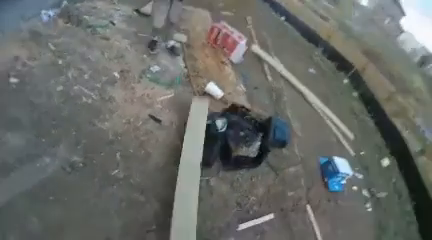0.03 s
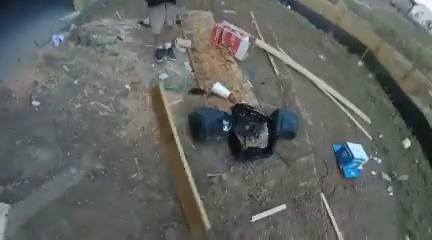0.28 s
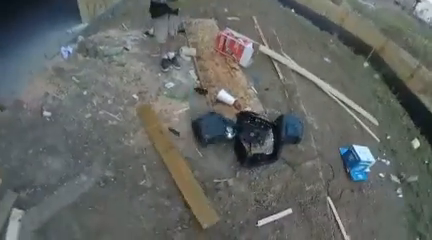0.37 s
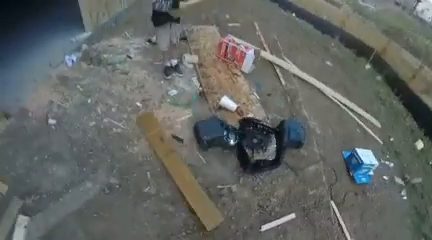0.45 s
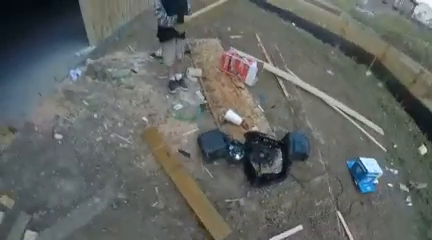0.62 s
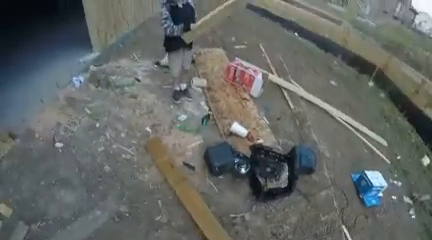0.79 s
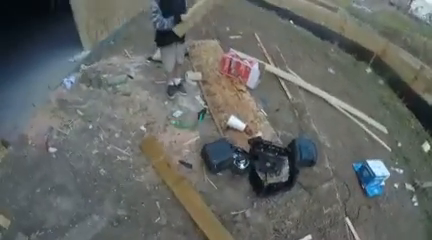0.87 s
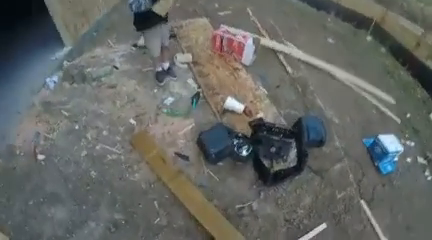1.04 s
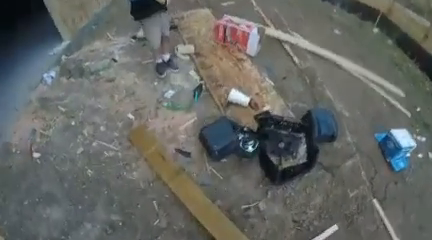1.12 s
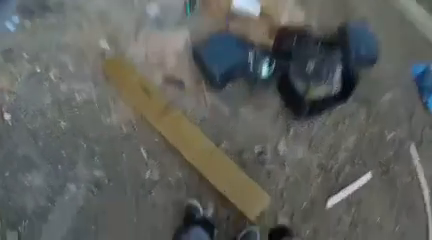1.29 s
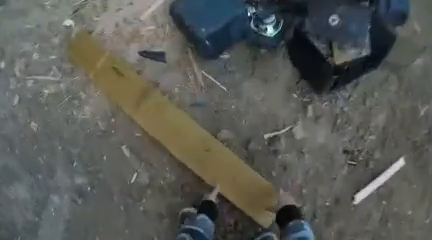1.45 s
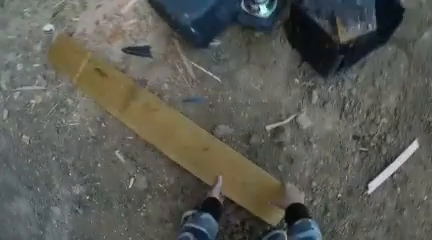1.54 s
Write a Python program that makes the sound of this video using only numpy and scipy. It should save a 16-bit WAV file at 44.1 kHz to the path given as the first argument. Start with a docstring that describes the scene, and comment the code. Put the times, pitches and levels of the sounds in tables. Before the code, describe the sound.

A wooden board smashes a plastic stereo with a sharp crack, and broken pieces clatter down.

```python
"""A building site: a wooden board smashes a plastic stereo, heard from where it is swung.
The case gives way in a burst of cracks, its panels ring and broken pieces clatter down;
the walls around throw the crash back. Then a step forward on gritty ground,
with air buffeting the microphone over distant site noise."""
import sys
import numpy as np
from scipy import signal
from scipy.fft import rfft, irfft
from scipy.io import wavfile

SR = 44100
rng = np.random.default_rng(int(sys.argv[2]) if len(sys.argv) > 2 else 0)


def dump_mix(stems):
    """Bounce the given channels to the path in sys.argv[1] as a 16-bit WAV at rate SR."""
    frames = np.atleast_2d(stems).T  # one column per channel
    limited = np.clip(frames, -1, 1)  # hard clip at full scale
    pcm = np.round(limited * 32767).astype(np.int16)
    wavfile.write(sys.argv[1], SR, pcm)


N = 70560
T = np.arange(N) / SR

# case cracks: start_s, level_db (re CRASH_DB), tilt_db_per_octave
CRACKS = [(0.2187, -11, -10.5), (0.22, -23, -8), (0.223, -5, -2.5), (0.2247, -4.5, 2), (0.2261, 0.5, 2),
          (.228, 3, -0.5), (0.2296, -0.5, -2), (.2312, -4, -8), (.235, -5, 4), (0.2395, -6, -3),
          (0.2486, -4, 3), (.2522, -8.5, -11), (0.2579, -10.5, 1), (0.2626, -11, -4.5)]
# case spectrum: freq_hz, level_db
CASE_SPECTRUM = [(60, -38), (160, -30), (280, -21), (430, -21.5), (580, -35), (780, -27), (920, -13.5),
                 (1080, -16.5), (1190, -22), (1360, -5), (1520, -14.5), (1700, -3.5), (2050, -2.5),
                 (2350, -5), (2600, 3), (2900, 3.5), (3150, -14), (3450, -7), (3700, -17), (4050, -4),
                 (5200, -5.5), (7200, -19), (9500, -13.5), (10800, -23.5), (13000, -27), (15500, -40.5)]
# case decay: freq_hz, t60_s
CASE_DECAY = [(200, .08), (1000, .06), (2700, 0.071), (5000, .075), (10000, .06), (15000, .06)]
# panel modes: pitch_hz, relative_db, t60_s
PANEL_MODES = [(324, -34.5, .35), (903, -21, 0.44), (972, -11, 0.12), (1370.4, -7.5, 0.13),
               (1685.5, -3, .23), (1772, -4, .18), (2170, -5.5, 0.21), (2561, -2.5, .17), (2759, -0.5, .18),
               (2826, -2.5, .17), (2896, 3, .19), (2980, -1.5, .19), (4310, -6, .17), (5440, -8.5, .17)]
# low board modes: pitch_hz, level_db, t60_s
BOARD_MODES = [(125, -44, .07), (234, -36.5, 0.11), (415, -35, .06), (490, -37, .05)]
CRASH_DB, BLOW_S = 18.5, .226

def crash(snap_db=-6.5, splinter_db=-3.5, panel_db=-7):
    """Each crack rings another part of the case; splinters spray, panels ring on, the board thuds."""
    case, out = np.zeros(N), np.zeros(N)
    for start_s, level_db, tilt_db in CRACKS:
        ring = dense_ring(CASE_DECAY)
        ring[0] += amp(snap_db) * rng.choice([-1, 1])
        crack = signal.fftconvolve(ring, colour(CASE_SPECTRUM, tilt_db))
        add(case, start_s, amp(level_db) * unit(crack))
    spray = impulses(per_s=5000) * fade(t60_s=.23)
    splinters = through(spray, colour(CASE_SPECTRUM, tilt_db=2.5))
    add(case, BLOW_S, amp(splinter_db) * unit(splinters))
    panels = ring_out(PANEL_MODES, rise_s=.015)
    add(out, BLOW_S, amp(CRASH_DB + panel_db) * unit(panels))
    add(out, CRACKS[0][0], ring_out(BOARD_MODES, rise_s=.012))
    return out + amp(CRASH_DB) * unit(case)


def dense_ring(decay, size=8192):
    """Countless close modes of even strength, each band dying at its own speed."""
    hz = np.fft.rfftfreq(size, 1 / SR)
    spectrum = rfft(rng.standard_normal(size))
    centres_hz, t60_s = np.transpose(decay)
    ring = np.zeros(size)
    for band_t60_s, selector in zip(t60_s, np.eye(len(t60_s))):
        band = irfft(spectrum * interp_log_hz(np.c_[centres_hz, selector], hz))
        ring += band * fade(band_t60_s)[:size] / np.sqrt(band_t60_s)
    return unit(ring)


def ring_out(modes, rise_s):
    """Struck modes swell, then decay freely."""
    ring = sum(amp(db) * sine(hz, rng.random()) * fade(t60_s) for hz, db, t60_s in modes)
    return ring * (1 - fade(rise_s))


# shard landings: start_s, level_db (re shard_db), tilt_db_per_octave, t60_s
SHARD_LANDINGS = [(0.347, -11.5, 10.5, .05), (.368, -5.5, -2, 0.026), (.462, -9, 2.5, 0.051),
                  (0.5144, -10.5, -0.5, 0.054), (.5423, -13.5, 5, .04), (0.5639, -8.5, 2, 0.058),
                  (.604, -9, 0.5, 0.077), (.631, -13, 1.5, 0.069), (0.648, -15, -2.5, 0.053),
                  (0.7163, -12, 3.5, 0.055), (.738, -14.5, -4, 0.1), (0.765, -15.5, 1, .05),
                  (.7807, -11.5, 2.5, 0.071), (.802, -20.5, -3, 0.071), (0.8422, -26.5, 4, .05),
                  (.857, -17.5, 2.5, 0.13), (0.9321, -14, 3.5, .04), (.966, -12.5, -9, 0.041),
                  (.98, -15, -0.5, 0.08), (1.0065, -12.5, -2, .08), (1.019, -16, -2, 0.11),
                  (1.055, -25.5, 1.5, .09), (1.2046, -29, -1, .02)]
# shard spectrum: freq_hz, level_db
SHARD_SPECTRUM = [(400, -35), (900, -18), (1300, -12.5), (1800, -2), (2300, -5), (2850, 4), (3200, -8),
                  (3750, -14), (4200, -7), (5200, -6), (7300, -20), (9700, -17.5), (11000, -28),
                  (15000, -33.5)]
# larger pieces ringing: start_s, pitch_hz, level_db, t60_s
PIECE_RINGS = [(.509, 7194, -46.5, 0.038), (0.5641, 2616, -33.5, 0.065), (.5642, 2939, -43.5, 0.26),
               (0.5886, 1732, -30, .075), (0.5885, 1287, -42, .15), (.5887, 889, -54, .6),
               (.5887, 2792, -45, .35), (.738, 1294, -51.5, 0.12), (0.9309, 4186, -33.5, .022),
               (.934, 2939, -40.5, 0.14), (.9314, 3440, -46, .06), (1.003, 1760, -45.5, .07),
               (1.014, 2822, -46.5, 0.051), (1.013, 4200, -53, .1)]

def clatter(shard_db=-7.5, tick_db=-3, bounce_db=-5, mean_bounce_s=.0036):
    """Each piece ticks and clinks on one edge, then on another; the larger ones ring."""
    out = np.zeros(N)
    for start_s, level_db, tilt_db, t60_s in SHARD_LANDINGS:
        contact = amp(tick_db) * unit(rng.standard_normal(N) * fade(t60_s=.022))
        add(contact, 0, shard_ring(t60_s))
        add(contact, mean_bounce_s * (.5 + rng.random()), amp(bounce_db) * shard_ring(t60_s))
        clink = through(contact, colour(SHARD_SPECTRUM, tilt_db))
        add(out, start_s, amp(shard_db + level_db) * unit(clink))
    attack = 1 - fade(t60_s=.006)
    for start_s, pitch_hz, level_db, t60_s in PIECE_RINGS:
        add(out, start_s, amp(level_db) * sine(pitch_hz) * fade(t60_s) * attack)
    return out


def shard_ring(t60_s, count=28):
    """A scrap of plastic has its own scatter of modes."""
    edges_hz = np.geomspace(800, 15000, count + 1)
    pitch_hz = rng.uniform(edges_hz[:-1], edges_hz[1:])
    t = T[:SR // 6]
    modes = np.sin(2 * np.pi * (pitch_hz * t[:, None] + rng.random(count)))
    return unit(modes.sum(1) * fade(t60_s, t))


# reflection envelope: delay_s, relative_db
ECHO_ENVELOPE = [(.015, -1), (0.071, 0.5), (.13, -1), (0.191, 0.5), (0.234, -3.5), (0.279, -14),
                 (.4, -16.5), (.55, -28), (.9, -57.5)]
# reflection spectrum: freq_hz, level_db
ECHO_SPECTRUM = [(100, -12), (220, -8.5), (350, 3.5), (900, 0), (1400, -1.5), (2700, 1), (5000, -2),
                 (9000, -8), (15000, -17.5)]

def echo(source, wet_db=-18):
    """Scattered reflections from walls and stacked timber: a quarter-second plateau, then a decay."""
    delay_s, level_db = np.transpose(ECHO_ENVELOPE)
    envelope = amp(np.interp(T, delay_s, level_db)) * (T > delay_s[0]) * (T < delay_s[-1])
    reflections = unit(impulses(per_s=3000) * envelope)
    wet = through(through(source, reflections), colour(ECHO_SPECTRUM))
    return amp(wet_db) * unit(wet) * np.linalg.norm(source)


# close knocks and snapping grit: start_s, pitch_hz, level_db, t60_s, push_db (re level_db)
KNOCKS = [(.9614, 1471, -24, 0.0049, -9.5), (.962, 460, -40, 0.018, -2),
          (1.4058, 5500, -23.5, 0.0033, -3.5), (1.4059, 3400, -29.5, 0.0051, -7),
          (1.4072, 1400, -46, .005, -6), (1.408, 2060, -50.5, 0.036, -15), (1.5477, 2750, -22, 0.0068, -17),
          (1.548, 1180, -17, 0.0094, -22), (1.553, 950, -40.5, 0.025, -18), (1.552, 1910, -39, 0.047, -14),
          (1.585, 2600, -41, 0.0098, -5), (1.586, 4840, -48, .007, 2)]

def knocks(rise_cycles=.71, contact_cycles=.86, grit_db=-21, lowpass_hz=8650):
    """A brief contact push, then a heavily damped, gritty ring; soft ground dulls the top."""
    out = np.zeros(N)
    for start_s, pitch_hz, level_db, t60_s, push_db in KNOCKS:
        grit = amp(grit_db) * noise([(pitch_hz / 2, 0), (pitch_hz, 0), (pitch_hz * 4, -24)])
        attack = np.minimum(T * pitch_hz / rise_cycles, 1)
        ring = (sine(pitch_hz) + grit) * fade(t60_s) * attack
        contact_phase = 2 * np.pi * pitch_hz * T / contact_cycles
        push = amp(push_db) * contact_phase * np.exp(1 - contact_phase)
        add(out, start_s, amp(level_db) * (ring + push))
    return signal.sosfilt(signal.butter(2, lowpass_hz, fs=SR, output="sos"), out)


# sole on grit: freq_hz, level_db
SCUFF_SPECTRUM = [(100, 15.5), (250, -4), (700, -12.5), (1500, 0), (3000, -11), (5000, -16), (8000, -35),
                  (15000, -56)]

def footstep(start_s=1.511, rise_s=.014, t60_s=.21):
    """A boot comes down with a low thump and a scuff."""
    out = np.zeros(N)
    weight = np.minimum(T / rise_s, 1) * fade(t60_s, T - rise_s)
    thump = amp(db=-25) * sine(hz=87)
    scuff = amp(db=-35) * noise(SCUFF_SPECTRUM)
    add(out, start_s, weight * (thump + scuff))
    return out


# distant site noise: freq_hz, level_db
SITE_SPECTRUM = [(59, -26), (100, -4), (214, -8.5), (270, -6), (808, -12.5), (917, -11), (1110, -13.5),
                 (1760, -13), (2630, -17), (15500, -38.5)]
# buffeting: freq_hz, level_db
BUFFET_SPECTRUM = [(3, -14), (8, 2.5), (30, -4.5), (50, -18), (90, -17.5), (150, -23.5), (300, -40),
                   (1000, -87.5)]
# gusts: time_s, level_db
GUSTS = [(0, -42), (.05, -44.5), (.09, -41.5), (.19, -38), (.3, -60), (.65, -60.5), (.88, -53.5),
         (1.2, -51), (1.3, -50.5), (1.38, -36.5), (1.46, -47.5), (1.56, -33.5), (1.6, -37)]

def air():
    """Distant site noise, and low buffeting as the microphone swings through the air."""
    site = amp(db=-59) * noise(SITE_SPECTRUM)
    gust_gain = amp(np.interp(T, *np.transpose(GUSTS)))
    return site + gust_gain * noise(BUFFET_SPECTRUM)


def amp(db):
    """Decibels to gain."""
    return 10 ** (np.asarray(db) / 20)


def unit(x):
    """Scales to unit energy."""
    return x / np.sqrt(np.sum(x ** 2) + 1e-20)


def sine(hz, phase_cycles=0):
    """Steady tone."""
    return np.sin(2 * np.pi * (hz * T + phase_cycles))


def fade(t60_s, t=T):
    """Exponential decay, 60 dB in t60_s."""
    return np.exp(-np.log(1000) * t / t60_s)


def impulses(per_s):
    """Clicks of random time and strength."""
    return rng.standard_normal(N) * (rng.random(N) < per_s / SR)


def add(mix, start_s, sound):
    """Mixes a sound in at start_s."""
    part = mix[round(start_s * SR):][:len(sound)]
    part += sound[:len(part)]


def through(x, response):
    """Convolves and cuts to length."""
    return signal.fftconvolve(x, response)[:N]


def interp_log_hz(points, hz):
    """Interpolates a table on a log-frequency axis."""
    freq_hz, value = np.transpose(points)
    return np.interp(np.log(hz + 1), np.log(freq_hz + 1), value)


def colour(spectrum, tilt_db=0, size=4096):
    """Minimum-phase click of a given spectral shape, tilted by tilt_db per octave over 1-10 kHz."""
    hz = abs(np.fft.fftfreq(size, 1 / SR))
    octaves = np.log2(np.clip(hz, 1000, 10000) / 3000)
    log_gain = np.log(amp(interp_log_hz(spectrum, hz) + tilt_db * octaves))
    response = np.exp(np.conj(signal.hilbert(log_gain)))
    return unit(np.fft.ifft(response).real[:size // 2])


def noise(spectrum):
    """Steady unit-rms noise of a given spectral shape."""
    gain = amp(interp_log_hz(spectrum, np.fft.rfftfreq(N, 1 / SR)))
    return unit(irfft(rfft(rng.standard_normal(N)) * gain, N)) * np.sqrt(N)


def scene():
    """The smash and its debris with their echo, close knocks, the step and the open air."""
    smash = crash() + clatter()
    return (smash + echo(smash) + knocks() + footstep() + air())[None]


def record(dry, ceiling=1.3, lowpass_hz=15400):
    """The microphone rounds off the highest peaks; short end fades and a band limit follow."""
    rounded = ceiling * np.tanh(dry / ceiling) * signal.windows.tukey(N, .008)
    taps = signal.firwin(301, lowpass_hz, window=("kaiser", 9), fs=SR)
    return signal.oaconvolve(rounded, taps[None], "same")


dry = scene()
out = record(dry)
dump_mix(out)
```